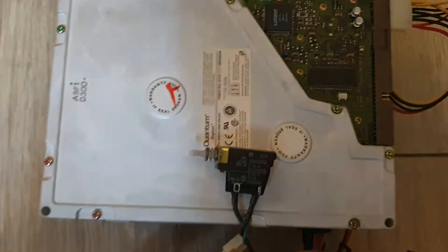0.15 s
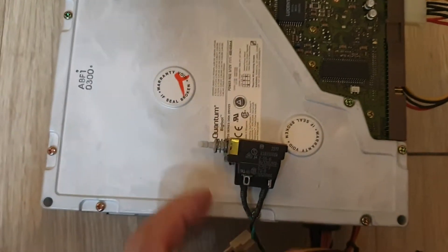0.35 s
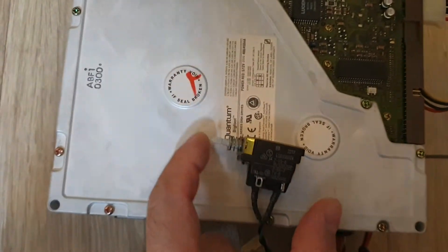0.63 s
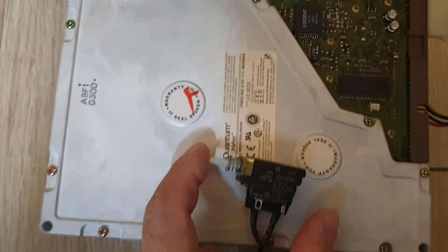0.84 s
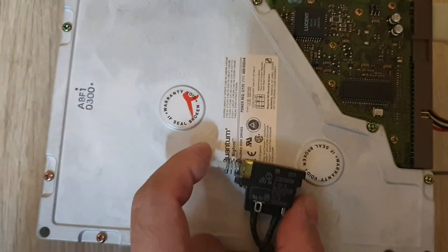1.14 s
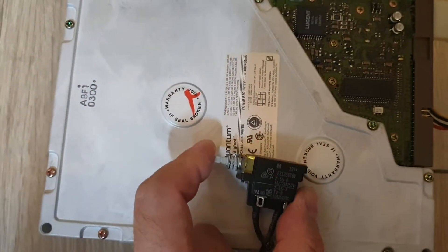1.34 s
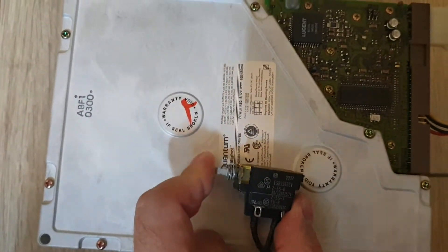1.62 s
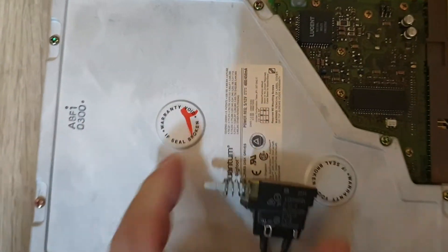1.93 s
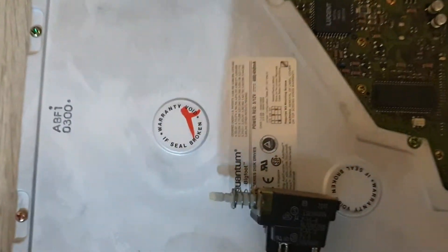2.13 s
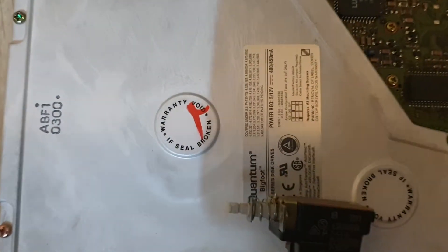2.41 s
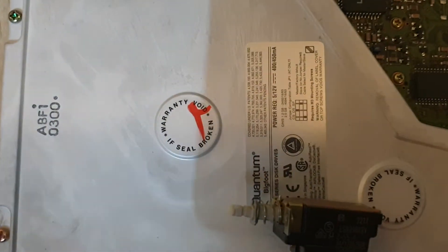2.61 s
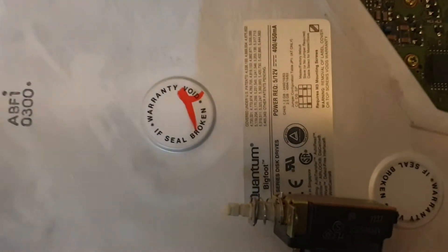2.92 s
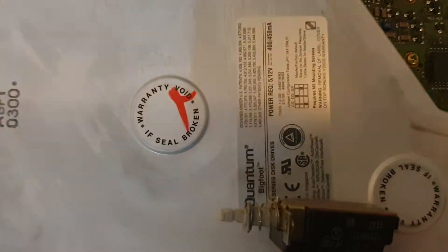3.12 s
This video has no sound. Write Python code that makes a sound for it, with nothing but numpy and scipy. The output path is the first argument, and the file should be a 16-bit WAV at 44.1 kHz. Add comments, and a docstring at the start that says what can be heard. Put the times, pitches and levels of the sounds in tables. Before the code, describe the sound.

Close stereo microphone over a running hard drive: dense, beating metallic whine, gritty buzz and airy hiss. Soft rubs, a small tick, a loud double click in a small room, then the motor coasts gradually lower.

```python
"""Old hard disk drive, close by: whining ball-bearing tones, the repeating buzz of the bearing cage, platter hiss.
The tones beat, flutter and rattle; the buzz loops a fixed roughness; the hiss is coloured noise over mains hum.
Fingers rub a push switch on the lid; it clicks in and knocks back out: noise snaps, struck lid modes, room tail.
The spindle then coasts down, and the sinking tones slide through the resonances of the case."""
import sys
import numpy as np
from scipy import signal
from scipy.fft import rfft, irfft
from scipy.io import wavfile

SR = 44100
rng = np.random.default_rng(int(sys.argv[2]) if len(sys.argv) > 2 else 0)


def log_audio(samples):
    """Write samples as a 16-bit WAV file to the path given in sys.argv[1]."""
    # one column per channel
    frames = np.atleast_2d(samples).T
    # limit to full scale, then quantise
    limited = np.clip(frames, -1, 1)
    pcm = np.round(limited * 32767).astype(np.int16)
    wavfile.write(sys.argv[1], SR, pcm)


N = 143766
T, BINS_HZ = np.arange(N) / SR, np.arange(N // 2 + 1) * SR / N

# Spindle; rates in Hz at full speed
POWER_OFF_S, SLOWING_PER_S, TAKEOVER_S = 1.863, .0785, .35
SPINDLE_HZ, CAGE_HZ = 60, 37.12
MIC_SHIFT_START_S, MIC_SHIFT_END_S = 0.31, 1.43  # microphone drifts to a new spot over the lid

# Bearing tones: f/Hz at full speed, relative level/dB at first, after the microphone shift, coasting,
# left-right/dB, likeness of the ears/-1..1, beat rate/(1/s) at full speed, beat depth/0..1
BEARING_TONES = [(288, -67, -70, -68, 4, 0.9, 2.3, 0.2), (519, -77, -77, -70, 1, 0.9, 7.0, 0.2),
                 (577, -81, -77, -69, 0, 0.9, 2.7, 0.3), (1560, -61, -64, -64, 5, 1.0, 2.4, 0.2),
                 (1786, -71, -70, -54, 5, -0.4, 2.3, 0.2), (2082, -70, -68, -66, -3, -0.6, 3.0, 0.8),
                 (2305, -62, -66, -70, -1, 0.2, 7.4, 0.3), (2343, -68, -61, -64, 3, -0.4, 3.6, 0.4),
                 (2378, -68, -63, -65, 3, 0.0, 3.4, 0.3), (2566, -66, -72, -70, 0, -0.1, 3.8, 0.4),
                 (2603, -64, -59, -60, 2, -0.1, 3.9, 0.4), (2638, -61, -58, -63, -2, -0.1, 3.8, 0.7),
                 (2770, -69, -62, -66, -1, -0.8, 4.1, 0.4), (2826, -50, -59, -59, -2, -0.4, 4.2, 0.4),
                 (2864, -60, -55, -55, 1, -0.1, 2.3, 0.1), (2964, -62, -61, -62, -1, -0.1, 6.4, 0.3),
                 (3055, -69, -75, -65, -4, 0.3, 5.3, 0.3), (3087, -55, -57, -56, -2, -0.1, 4.8, 0.4),
                 (3126, -62, -56, -53, -4, 0.7, 4.6, 0.4), (3165, -63, -65, -55, -8, 0.6, 5.0, 0.3),
                 (3217, -66, -63, -62, -3, 0.3, 6.9, 0.3), (3352, -69, -64, -61, -4, -0.3, 5.1, 0.4),
                 (3389, -72, -66, -54, -10, -0.2, 5.1, 0.5), (3417, -65, -63, -59, -6, 0.6, 5.1, 0.1),
                 (3510, -75, -73, -62, -6, -0.1, 7.3, 0.3), (3546, -66, -68, -68, -1, 0.1, 4.5, 0.2),
                 (3611, -70, -84, -60, -7, 0.4, 6.1, 0.2), (3644, -77, -73, -56, -7, 0.6, 2.9, 0.2),
                 (3679, -66, -69, -66, -3, 0.4, 6.2, 0.3), (3900, -59, -58, -70, -9, 0.4, 6.0, 0.6),
                 (4079, -65, -62, -62, -4, 0.4, 8.8, 0.3), (4128, -73, -70, -66, -5, 0.3, 4.9, 0.4),
                 (4164, -60, -60, -54, -6, 0.3, 5.9, 0.6), (4387, -62, -59, -62, -9, 0.1, 6.5, 0.3),
                 (4425, -61, -63, -58, -4, -0.0, 6.2, 0.3), (4461, -65, -67, -66, -3, -0.1, 9.8, 0.2),
                 (4655, -64, -66, -62, -6, 0.1, 10.1, 0.3), (4682, -67, -65, -60, -6, -0.1, 7.5, 0.4),
                 (4903, -73, -59, -63, -12, 0.1, 7.4, 0.3), (4943, -58, -57, -57, -10, -0.8, 6.7, 0.6),
                 (4986, -61, -60, -62, -9, -0.7, 10.6, 0.8), (5036, -66, -70, -69, -11, -0.3, 7.7, 0.4),
                 (5167, -58, -63, -66, -7, -0.6, 7.8, 0.5), (5204, -56, -54, -52, -8, -0.9, 7.3, 0.8),
                 (5280, -66, -66, -68, -10, -0.7, 11.2, 0.8), (5460, -64, -56, -56, -8, -0.1, 7.1, 0.2),
                 (5527, -66, -68, -63, -8, -0.5, 12.0, 0.2), (5562, -62, -62, -63, -8, -0.1, 11.9, 0.5),
                 (5729, -64, -68, -59, -6, -0.4, 8.9, 0.5), (5943, -64, -62, -74, -3, 0.1, 9.1, 0.2),
                 (5978, -54, -52, -57, -2, 0.1, 9.4, 0.2), (6251, -71, -78, -61, 0, -0.2, 9.7, 0.4),
                 (6511, -71, -68, -59, -2, 0.3, 9.7, 0.3), (6726, -69, -64, -66, 1, 0.1, 3.3, 0.3),
                 (6760, -64, -66, -61, 0, -0.2, 10.4, 0.2), (7018, -63, -56, -58, -1, 0.1, 10.2, 0.1),
                 (7293, -74, -65, -58, 4, 0.4, 2.8, 0.3), (7341, -80, -86, -62, 5, 0.5, 4.9, 0.2),
                 (7541, -66, -66, -65, -6, 0.5, 11.4, 0.3)]
TONES_GAIN_DB, TONE_FLUTTER_DB, CASE_RIPPLE_DB = 0.59, 1.0, 2
TONE_RATTLE, PHASE_WANDER_RAD = .08, 0.1

# Strongest bearing tone before flutter and ripple: t/s, level/dB
WHINE_LEVEL = [(0, -42), (.8, -45.3), (1.1, -47), (1.95, -47), (2.2, -53), (2.5, -50), (3.26, -54)]
WHINE_HZ, WHINE_PAN_DB, WHINE_LIKENESS, WHINE_RATTLE = 2898.5, -7, -.1, .08
WHINE_BEAT_PER_S, WHINE_BEAT_DEPTH, WHINE_FIRST_SWELL_S = 4.12, .38, .055

# Case resonances crossed by the sinking tones: f/Hz, width/Hz (Gaussian sigma), relative level/dB
CASE_RESONANCES = [(284, 11, 23), (498, 10, 16), (546, 10, 13), (1515, 45, 8), (1680, 25, 13),
                   (1800, 25, 11), (2340, 140, 8), (2595, 140, 9), (2900, 130, 14), (3135, 45, 5),
                   (3210, 25, 4), (3435, 45, 6), (3900, 70, 7), (4000, 45, 11), (4095, 60, 4),
                   (4830, 45, 4), (4965, 140, 5), (5220, 80, 11), (5565, 140, 7), (5835, 140, 11),
                   (6705, 80, 8)]

# Cage roughness: f/Hz at full speed, relative level/dB per harmonic
BUZZ_SPECTRUM = [(300, -100), (1300, -102), (1620, -72), (2000, -76.5), (2450, -77.5), (3000, -66),
                 (3800, -78.5), (5200, -75), (7200, -70.5), (8500, -87), (11000, -83), (13000, -103.5),
                 (16000, -100)]
BUZZ_COAST_DB, BUZZ_WOBBLE = -1.5, 0.23

# Hiss of platters and room: f/Hz, relative level/dB per Hz driven, the same coasting
AIR_SPECTRUM = [(20, -125, -122), (33.2, -110, -108), (54, -91, -93), (76, -98, -89), (101, -95.5, -103),
                (204, -100.5, -102), (380, -102, -102), (455, -94.5, -96), (637, -95.5, -101),
                (740, -107, -108), (1060, -108, -111), (1254, -112, -114), (1376, -101, -95),
                (1650, -97, -85.5), (2020, -94.5, -100), (2550, -93, -89), (3200, -87, -82),
                (3570, -87, -90.5), (3880, -92.5, -83.5), (5200, -91, -87), (6400, -87, -84.5),
                (7150, -102.5, -86), (8570, -104, -100), (9300, -110, -103), (10800, -107, -104),
                (12600, -115, -108), (15400, -120, -112)]
# Likeness of the hiss in both ears: f/Hz, likeness/-1..1
AIR_LIKENESS = [(60, 0.11), (200, 0.72), (640, 0.76), (1400, -0.34), (3000, 0.11), (15000, -0.099)]
# Faint treble hiss while coasting, before its colour: t/s, level/dB per Hz
TREBLE_LEVEL = [(0, -130), (2.28, -125), (2.31, -100), (2.5, -99), (2.8, -100), (3.05, -108), (3.26, -112)]
# Its colour: f/Hz, gain/dB
TREBLE_COLOUR_DB = [(3000, -38), (7500, -16), (12000, 4), (16000, -10)]
AIR_FLICKER_DB, MAINS_HZ, MAINS_DB = -0.5, 120, -69

# Lid and switch modes: f/Hz, relative level/dB, t60/s
LID_MODES = [(295, -36, 0.23), (513, -31.5, 0.16), (613, -36.5, 0.15), (1022, -37, 0.13),
             (1128, -33.5, 0.075), (1330, -42, 0.036), (1720, -36, 0.034), (1466, -25.5, 0.039),
             (1557, -23, 0.044), (1636, -23, 0.03), (2040, -44, 0.033), (2090, -20.5, 0.041),
             (2125, -24, 0.047), (2720, -30, 0.031), (3330, -27.5, 0.016), (4110, -23.5, 0.012),
             (4860, -28, 0.0044), (6800, -50, 0.011), (10080, -28.5, 0.01)]
# Knocks of the switch body on the lid: t/s, relative level/dB
LID_KNOCKS = [(1.8247, -12), (1.9040, 4), (1.9055, -12), (1.9143, -10.5), (1.9157, -15)]
# Rubs of fingers and switch on the lid: t/s, length/s (Gaussian sigma), relative level/dB
LID_RUBS = [(0.548, 0.019, -51.5), (.916, 0.012, -57), (1.111, 0.012, -42), (1.232, 0.0074, -53),
            (1.547, 0.007, -49), (1.644, 0.008, -51)]
# Scuff colour of the rubs: f/Hz, relative gain/dB
SCUFF_COLOUR = [(150, -34.5), (400, -3), (600, 13.5), (800, 1), (1050, -24), (1500, 19), (2200, -6),
                (3500, -28.5), (10000, -18)]
CONTACT_S, KNOCK_LOW_CUT_HZ, KNOCK_PAN_DB = 0.00019, 1030, 3.5
KNOCK_CRACK_DB, KNOCK_CRACK_T60_S = -23, 0.031
RUB_SOFT_HZ, SCUFF_GAIN_DB = 1940, -4.5  # a fingertip hardly drives the modes above RUB_SOFT_HZ

# Switch latch snaps: t/s, relative level/dB, low cut f/Hz
LATCH_SNAPS = [(1.5816, -9.5, 3800), (1.8215, -17, 300), (1.8296, -10, 300), (1.8318, 5, 200),
               (1.8325, 0, 200)]
# Snap colour: f/Hz, relative gain/dB
LATCH_COLOUR = [(100, -40), (250, -42), (530, 0.5), (780, -18), (1000, -13), (1450, -4), (2130, 3.5),
                (2960, -8), (4040, 6), (5040, -4.5), (6400, 2), (7100, -4), (8900, -0.5), (12000, -5),
                (16000, -13.5)]
# Snap balance: f/Hz, left-right/dB
LATCH_PAN = [(2000, 1.5), (4500, -2.5), (6500, -8), (9000, 2.5), (14000, 2.5)]
SNAP_GAIN_DB, SNAP_T60_S = -12.5, 0.016
SNAP_TAIL_DB, SNAP_TAIL_T60_S = -18.5, 0.15  # tail level relative to the snap

# Low bumps of handling: t/s, length/s (Gaussian sigma), level/dB
HANDLING_BUMPS = [(2.19, 0.022, -62.5), (2.35, 0.02, -62.5)]
# Bump colour: f/Hz, relative gain/dB
HANDLING_COLOUR = [(25, -20), (55, 5), (85, 3), (150, -6), (400, -40), (2000, -78)]

ROOM_DB, ROOM_T60_S, ROOM_DELAY_S = -18, 0.24, 0.0056
CUTOFF_HZ = 16300


def from_db(db):
    """Decibels to amplitude gain."""
    return 10 ** (np.asarray(db) / 20)


def pan(db):
    """Left and right gains of constant total power, db apart."""
    gains = from_db([[db / 2], [-db / 2]])
    return gains / np.sqrt(np.mean(gains ** 2))


def at_hz(points, hz, axis=1):
    """Read a spectrum column, interpolated on log frequency."""
    p = np.array(points)
    return np.interp(np.log(hz + 1), np.log(p[:, 0]), p[:, axis])


def colour(x, db):
    """Zero-phase filter with one gain per frequency bin."""
    return irfft(rfft(x) * from_db(db), N)


def cut(x, order, hz, kind="low"):
    """Butterworth filter."""
    return signal.sosfilt(signal.butter(order, hz, kind, fs=SR, output="sos"), x)


def wander(x):
    """Smooth random curve of spread about 1, heading for a new value at each unit of x."""
    i = x.astype(int)
    knots, f = rng.standard_normal(1024), x - i
    f = f * f * (3 - 2 * f)
    return 1.15 * (knots[i % 1024] * (1 - f) + knots[(i + 1) % 1024] * f)


def strike(start_s, response):
    """Delay a stereo response to its start time."""
    return np.pad(response, ((0, 0), (int(start_s * SR), 0)))[:, :N]


def burst(t60_s, shared=0.49):
    """Exponentially decaying stereo noise, partly shared by both sides."""
    noise = rng.standard_normal((2, N)) + shared * rng.standard_normal(N)
    return noise / np.hypot(1, shared) * from_db(-60 * T / t60_s)


def swells(rows):
    """Noise with one Gaussian swell per row."""
    envelope = sum(from_db(db) * np.exp(-((T - s) / length_s) ** 2 / 2) for s, length_s, db in rows)
    return rng.standard_normal(N) * envelope


def spindle():
    """Exponential coast-down: speed (1 = full), its integral in s, share of coasting."""
    off_s = np.maximum(T - POWER_OFF_S, 0)
    speed = np.exp(-SLOWING_PER_S * off_s)
    return speed, np.cumsum(speed) / SR, np.clip(off_s / TAKEOVER_S, 0, 1)


def beat(per_s, depth, turn, swell_s):
    """Two balls rolling at nearly the same rate beat; the beat slows with the spindle."""
    return (1 + depth * np.exp(2j * np.pi * per_s * (turn - swell_s))) / np.hypot(1, depth)


def case_swell(hz, speed, coast, size=256):
    """Gain (dB) of a tone sinking through the case resonances, about its mean power while coasting."""
    now_hz = hz * speed[::size]
    db = sum(peak_db * np.exp(-((now_hz - centre_hz) / width_hz) ** 2 / 2)
             for centre_hz, width_hz, peak_db in CASE_RESONANCES)
    mean_db = 10 * np.log10(np.average(from_db(db) ** 2, weights=coast[::size]))
    return coast * np.interp(T, T[::size], db - mean_db)


def tone(hz, db, throb, pan_db, alike, rattle, speed, turn, size=32):
    """Bearing tone: beats, flutters, rattles, ripples as it sinks; a fixed phase parts the ears."""
    t, slid_hz = T[::size], hz * (1 - speed[::size])
    flutter_db = TONE_FLUTTER_DB * wander(5 * t)
    ripple_db = CASE_RIPPLE_DB * np.minimum(slid_hz / 30, 1) * wander(slid_hz / 45)
    per_s, depth, swell_s = throb
    # complex level: magnitude and phase on a coarse time grid
    level = from_db(db[::size] + flutter_db + ripple_db) * beat(per_s, depth, turn[::size], swell_s)
    level = level * (1 + rattle * (wander(90 * t) + 1j * wander(90 * t)))
    level = level * np.exp(1j * (PHASE_WANDER_RAD * wander(7 * t) + rng.uniform(0, 2 * np.pi)))
    wave = np.interp(T, t, level) * np.exp(2j * np.pi * hz * turn)
    apart_rad = rng.choice([-1, 1]) * np.arccos(np.clip(alike, -1, 1))
    ears = np.array([wave.real, (wave * np.exp(1j * apart_rad)).real])
    return pan(pan_db) * np.sqrt(2) * ears


def bearings(speed, turn, coast):
    """Ball-bearing tones, all scaled in frequency by spindle speed."""
    whine_db = np.interp(T, *np.transpose(WHINE_LEVEL))
    throb = WHINE_BEAT_PER_S, WHINE_BEAT_DEPTH, WHINE_FIRST_SWELL_S
    out = tone(WHINE_HZ, whine_db, throb, WHINE_PAN_DB, WHINE_LIKENESS, WHINE_RATTLE, speed, turn)
    shifted = np.interp(T, [MIC_SHIFT_START_S, MIC_SHIFT_END_S], [0, 1])
    for hz, first_db, shifted_db, coasting_db, pan_db, alike, per_s, depth in BEARING_TONES:
        driven_db = first_db + shifted * (shifted_db - first_db)
        db = TONES_GAIN_DB + driven_db + coast * (coasting_db - driven_db)
        db = db + case_swell(hz, speed, coast)
        out += tone(hz, db, (per_s, depth, rng.random()), pan_db, alike, TONE_RATTLE, speed, turn)
    return out


def buzz(turn, coast, count=430, size=16384):
    """Same roughness on every cage turn, pressed harder once per spindle turn."""
    hz = CAGE_HZ * np.arange(count)
    chance = rng.standard_normal((2, count)) + 1j * rng.standard_normal((2, count))
    orders = from_db(at_hz(BUZZ_SPECTRUM, hz)) * chance * (hz > 0)
    track = irfft(orders, size) * size / 2
    place = turn * CAGE_HZ % 1 * size
    out = np.array([np.interp(place, np.arange(size), side) for side in track])
    wobble = 1 + BUZZ_WOBBLE * np.sin(2 * np.pi * SPINDLE_HZ * turn)
    return out * wobble * from_db(BUZZ_COAST_DB * coast)


def air(coast):
    """Platter hiss and room rumble as partly shared noise, treble hiss, mains hum."""
    mid, side = rng.standard_normal((2, N))
    alike = np.clip(at_hz(AIR_LIKENESS, BINS_HZ), -.99, .99)
    common, opposed = rfft(mid) * np.sqrt(1 + alike), rfft(side) * np.sqrt(1 - alike)
    per_hz = np.sqrt(SR / 2)  # white noise to unit power per Hz
    noise = irfft(common + opposed * [[1], [-1]], N) * per_hz
    driven = colour(noise, at_hz(AIR_SPECTRUM, BINS_HZ))
    coasting = colour(noise, at_hz(AIR_SPECTRUM, BINS_HZ, axis=2))
    hiss = (1 - coast) * driven + coast * coasting
    hiss = hiss * from_db(AIR_FLICKER_DB * wander(60 * T))
    treble = colour(rng.standard_normal((2, N)) * per_hz, at_hz(TREBLE_COLOUR_DB, BINS_HZ))
    treble = treble * from_db(np.interp(T, *np.transpose(TREBLE_LEVEL)))
    hum = from_db(MAINS_DB) * np.sqrt(2) * np.sin(2 * np.pi * MAINS_HZ * T)
    return hiss + treble + hum


def lid():
    """Knocks and rubs ring the lid modes; a knock also cracks, a rub scuffs."""
    ring = sum(from_db(db - 60 * T / t60_s) * np.sin(2 * np.pi * hz * T) for hz, db, t60_s in LID_MODES)
    ring = ring * (1 - np.exp(-T / CONTACT_S))
    force = cut(swells(LID_RUBS), 2, RUB_SOFT_HZ) / np.sqrt(np.sum(ring ** 2))
    crack = 0
    for s, db in LID_KNOCKS:
        force[int(s * SR)] += from_db(db)
        crack = crack + strike(s, from_db(db + KNOCK_CRACK_DB) * burst(KNOCK_CRACK_T60_S))
    crack = cut(crack, 1, [300, 4500], "band")
    rung = cut(signal.fftconvolve(force, ring)[:N], 2, KNOCK_LOW_CUT_HZ, "high")
    scuff = colour(swells(LID_RUBS), SCUFF_GAIN_DB + at_hz(SCUFF_COLOUR, BINS_HZ))
    return pan(KNOCK_PAN_DB) * (rung + crack + scuff)


def latch():
    """Bright noise snaps, each with a short noisy jangle of the spring."""
    out = 0
    for s, db, low_cut_hz in LATCH_SNAPS:
        jangle = from_db(SNAP_TAIL_DB) * burst(SNAP_TAIL_T60_S, shared=0.23)
        snap = burst(SNAP_T60_S, shared=0.099) + jangle
        out = out + strike(s, from_db(db) * cut(snap, 2, low_cut_hz, "high"))
    sides_db = at_hz(LATCH_PAN, BINS_HZ) * [[.5], [-.5]]
    return colour(out, SNAP_GAIN_DB + at_hz(LATCH_COLOUR, BINS_HZ) + sides_db)


def room(x):
    """Short, dull indoor tail: low-passed decaying noise as impulse response."""
    tail = signal.lfilter([1], [1, -.6], strike(ROOM_DELAY_S, burst(ROOM_T60_S)))
    tail = tail / np.sqrt(np.sum(tail ** 2) / 2)
    return from_db(ROOM_DB) * signal.fftconvolve(x, tail, axes=1)[:, :N]


def bumps():
    """Dull handling noise, alike in both ears; colour normalised to unit power."""
    db = at_hz(HANDLING_COLOUR, BINS_HZ)
    return colour(swells(HANDLING_BUMPS), db) / np.sqrt(np.mean(from_db(db) ** 2))


def scene():
    """Drive, plus the switch on its lid; only the switch feeds the room tail."""
    speed, turn, coast = spindle()
    drive = bearings(speed, turn, coast) + buzz(turn, coast) + air(coast)
    switch = lid() + latch()
    return drive + switch + room(switch) + bumps()


def record(dry):
    """Steep zero-phase elliptic low-pass."""
    return signal.sosfiltfilt(signal.ellip(10, .05, 70, CUTOFF_HZ, fs=SR, output="sos"), dry)


dry = scene()
out = record(dry)
log_audio(out)
```